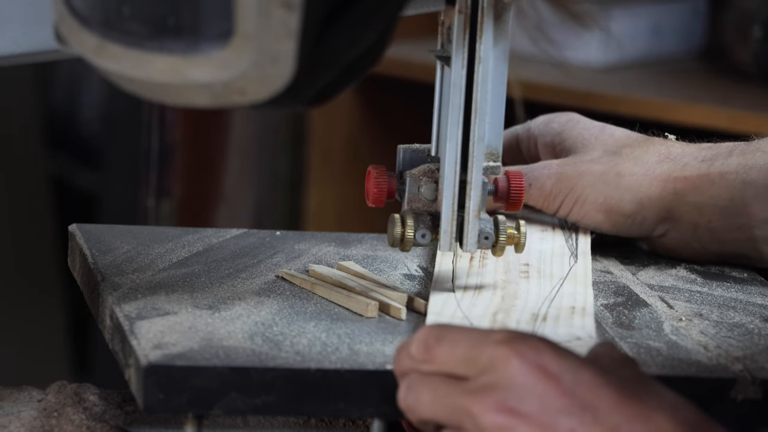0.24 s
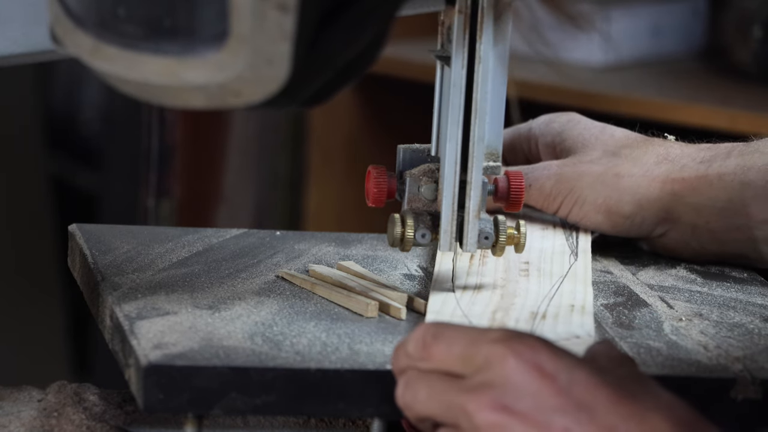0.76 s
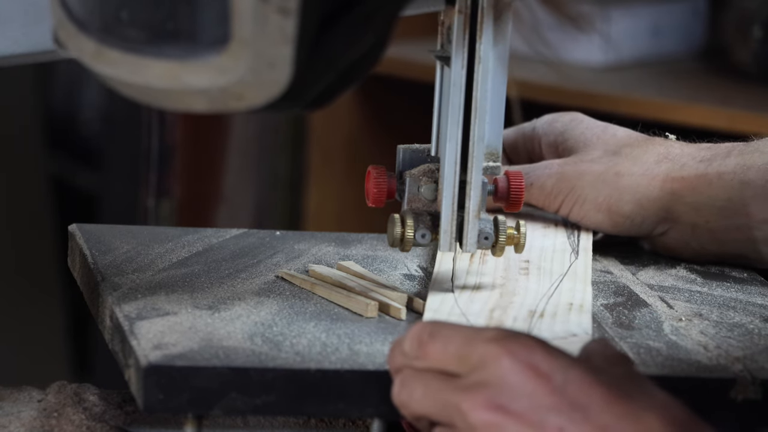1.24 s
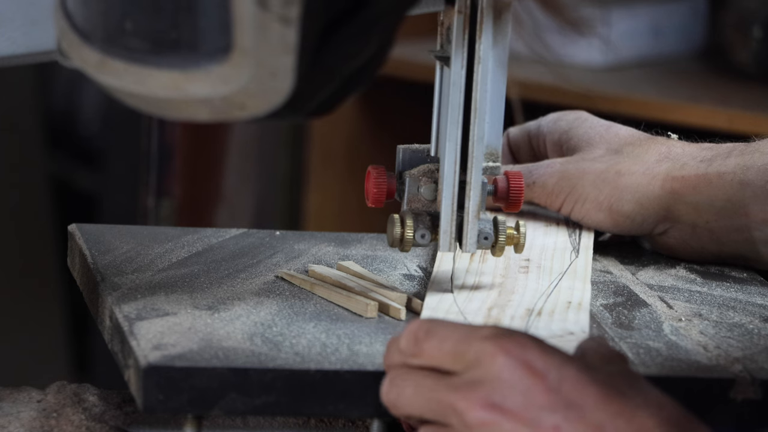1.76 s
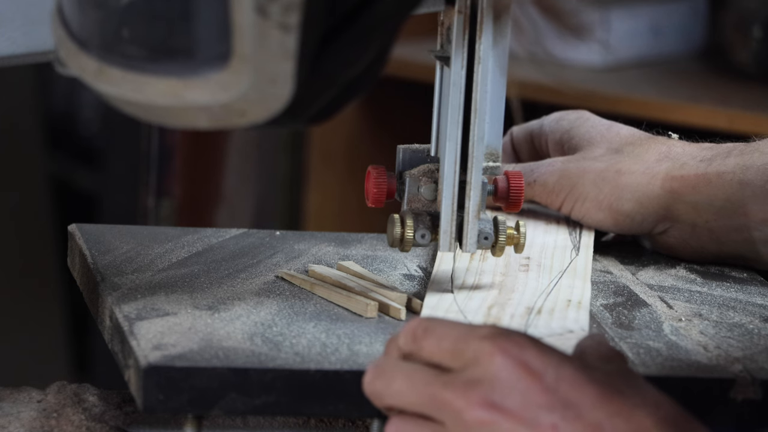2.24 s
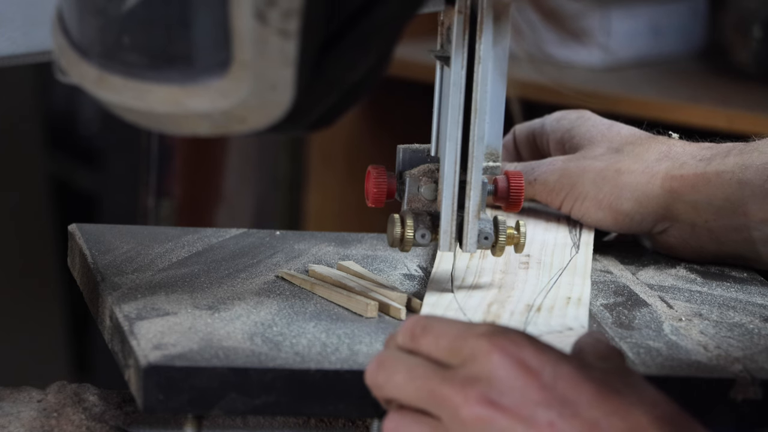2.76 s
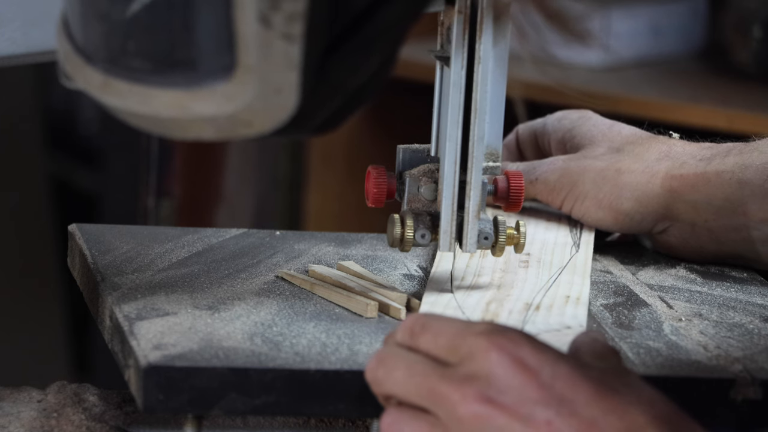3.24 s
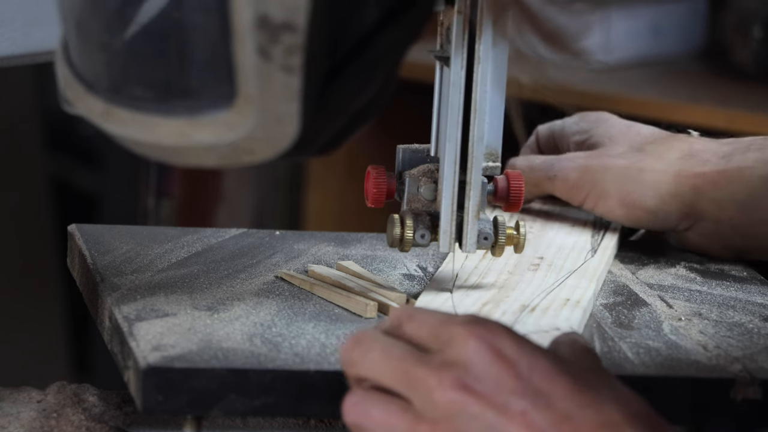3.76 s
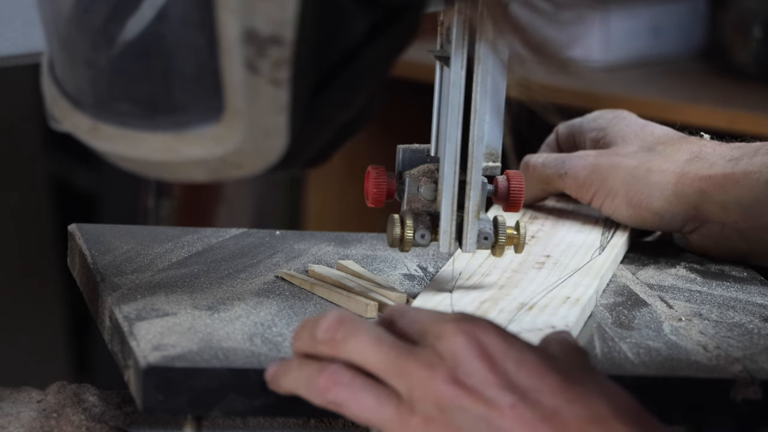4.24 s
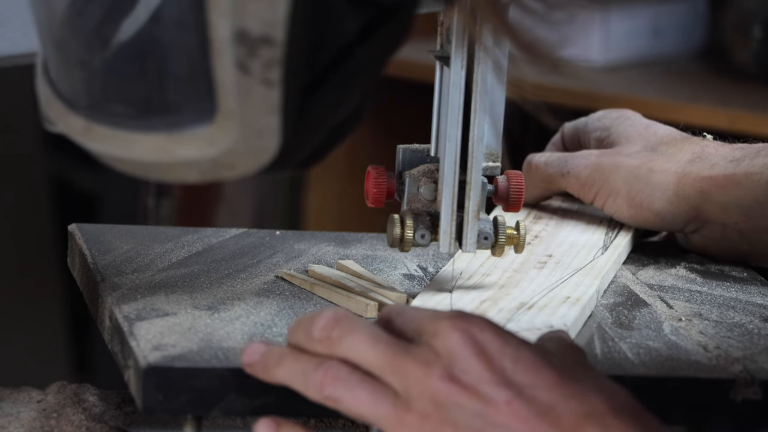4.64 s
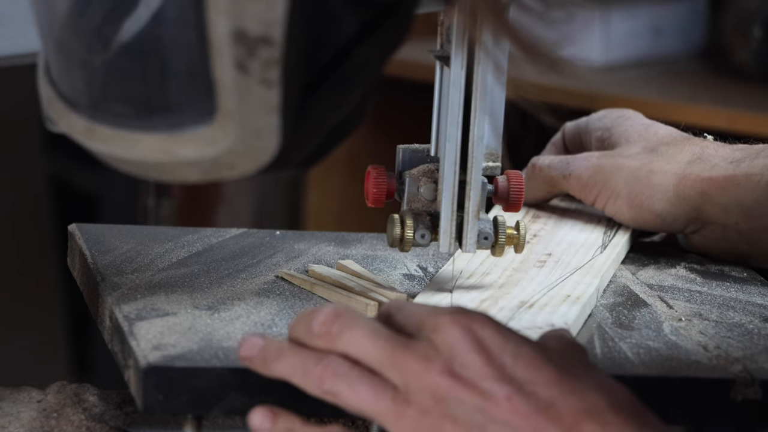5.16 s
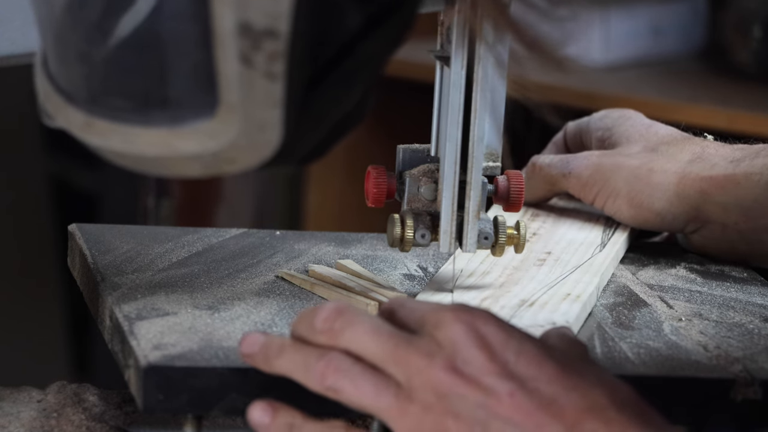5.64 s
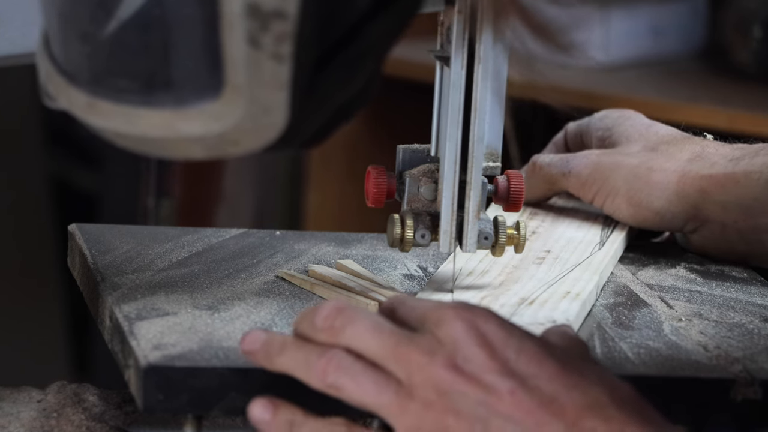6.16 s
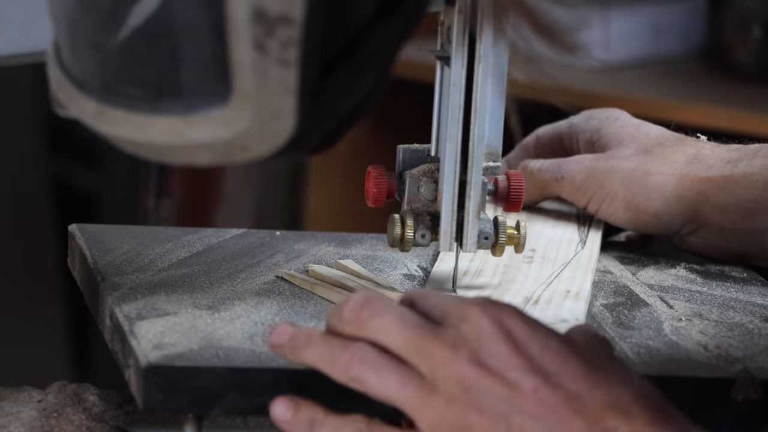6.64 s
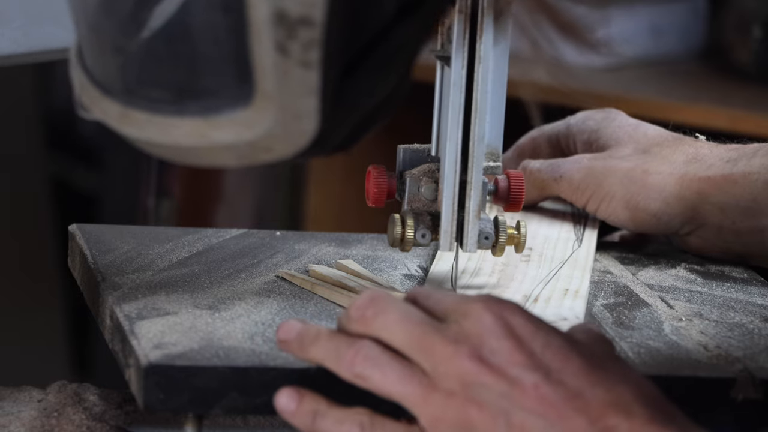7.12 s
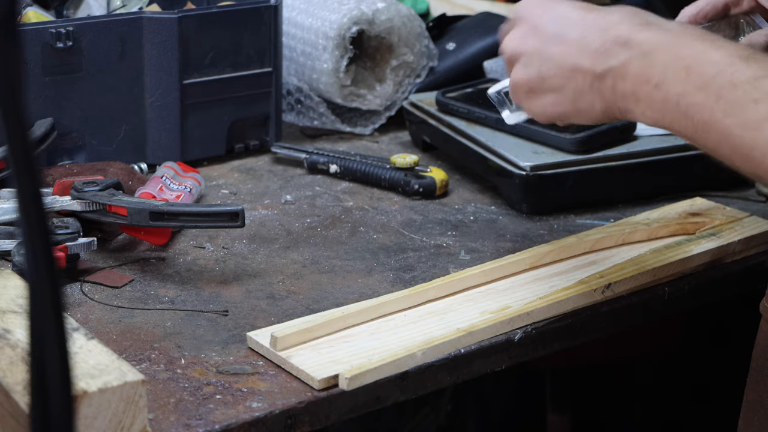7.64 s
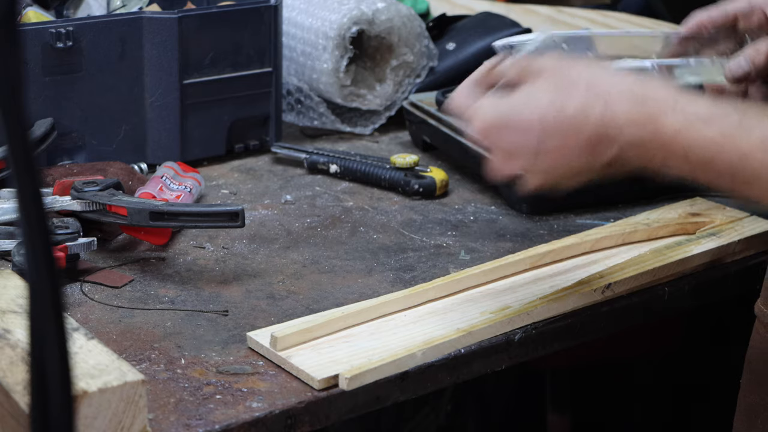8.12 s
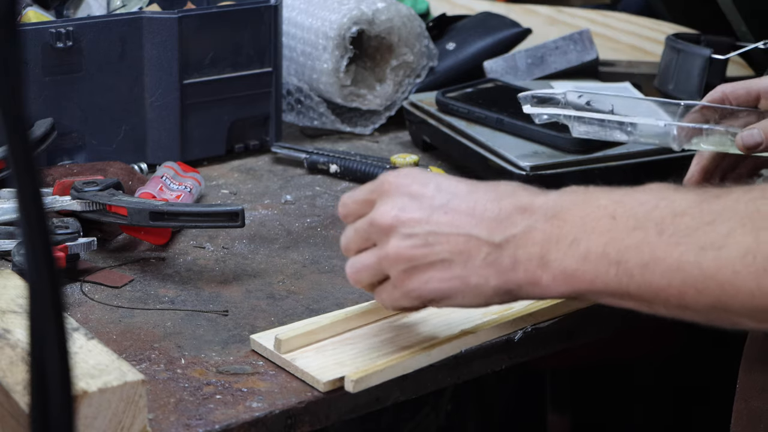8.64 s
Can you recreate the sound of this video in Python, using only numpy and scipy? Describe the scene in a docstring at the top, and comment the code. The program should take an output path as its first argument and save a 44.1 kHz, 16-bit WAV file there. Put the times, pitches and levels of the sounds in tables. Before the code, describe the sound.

In a small workshop a running bandsaw cuts a thin wooden board, heard close and in stereo: piercing metallic whine near one kilohertz and its overtones, dense rasp and bright hiss, with brief easings. After about seven and a half seconds it stops instantly, leaving a quiet bench with low wavering hum, faint room air and a few tiny plastic ticks.

```python
"""From 0 s a bandsaw cuts a thin board in a small workshop: teeth strike about 960 times a second.
Harmonics of the tooth rate make the whine; coloured noise that partly repeats each blade lap makes the cut.
The wheels throb, and narrow noise bands come and go: singing resonances, a low hum and more whine orders.
At 7.58 s the scene changes to a quiet bench: a low sine hum wavers in filtered noise,
with ticks early on made of short decaying noise bursts."""
import sys
import numpy as np
from scipy import signal
from scipy.fft import rfft, irfft, next_fast_len
from scipy.io import wavfile
from scipy.ndimage import uniform_filter1d

SR = 44100
rng = np.random.default_rng(int(sys.argv[2]) if len(sys.argv) > 2 else 0)


def unload_wav(signal):
    """Save mono or channel-first audio to the path in sys.argv[1] as 16-bit WAV at rate SR, clipped to [-1, 1]."""
    wavfile.write(
        sys.argv[1],
        SR,
        np.round(np.clip(np.atleast_2d(signal).T, -1, 1) * 32767).astype(np.int16),
    )


N = 392037


def from_db(db):
    """Decibel law: amplitude gain is ten to the level over twenty."""
    return 10 ** (np.asarray(db) / 20)


def rms_one(x):
    """Energy normalisation: scale a signal to unit root-mean-square."""
    return x / np.sqrt(np.mean(x ** 2) + 1e-20)


def in_time(rows):
    """Linear interpolation: one curve per column, at every sample."""
    times, *columns = np.transpose(rows)
    seconds = np.arange(N) / SR
    return [np.interp(seconds, times, column) for column in columns]


def bins_hz():
    """Fourier analysis: the bin frequencies of a transform that holds the whole scene."""
    return np.maximum(np.fft.rfftfreq(next_fast_len(N), 1 / SR), 1)


def at_bins(points):
    """Logarithmic frequency scale: a (frequency, value) table read at the Fourier bins."""
    hz, value = np.transpose(points)
    return np.interp(np.log(bins_hz()), np.log(hz), value)


def drift(rate_hz, size=N):
    """Low-pass random process: two equal poles leave slow fluctuations of unit rms."""
    step = 40   # the slow process is drawn at every 40th sample
    pole = np.exp(-2 * np.pi * step * rate_hz / SR)
    noise = rng.standard_normal(size // step + 2002)
    slow = signal.lfilter([1], [1, -2 * pole, pole * pole], noise)[2000:]   # drop the settling
    return np.interp(np.arange(size) / step, np.arange(len(slow)), rms_one(slow))


def bump(center_s, length_s):
    """Gaussian envelope: a smooth rise and fall of height 1."""
    return np.exp(-(4 * (np.arange(N) / SR - center_s) / length_s) ** 2 / 2)


def white():
    """White noise: a random spectrum with equal mean power at all frequencies."""
    return rfft(rng.standard_normal(next_fast_len(N)))


def played_bands(mid, side, spectrum, modes, side_db, balance_db, edges_hz, levels_db):
    """Source-filter principle: colour mid and side noise, then play each band at its own level."""
    hz = bins_hz()
    modes_db = sum(db / (1 + (2 * (hz - at) / width) ** 2) for at, width, db in modes)
    colour = from_db(at_bins(spectrum) + modes_db)
    side = side * from_db(side_db)
    left = (mid + side) * from_db(balance_db / 2)
    right = (mid - side) * from_db(-balance_db / 2)
    pair = colour * np.array([left, right])
    below = [0 * hz] + [1 / (1 + (hz / edge) ** 6) for edge in edges_hz] + [0 * hz + 1]
    out = 0
    for low, high, level_db in zip(below, below[1:], levels_db):
        band = irfft(pair * (high - low), next_fast_len(N))[:, :N]
        mid_rms = np.sqrt(np.mean(band.mean(0) ** 2))
        out = out + from_db(level_db) * band / mid_rms
    return out


def thinned(sound, hz, width_hz, share):
    """Band rejection by subtraction: take away a share of one resonant band."""
    band = signal.lfilter(*signal.iirpeak(hz, hz / width_hz, fs=SR), sound)
    return sound - np.clip(share, 0, 1) * band


# Hands brush the tray: (time [s], length [s], swell of the rustle [dB])
TRAY_BRUSHES = [(7.71, 0.056, 3.5), (8.14, .04, 4), (8.703, .1, 2)]
# Bench levels: (time [s], hum level [dB], low drone level [dB], rustle level before brushes [dB])
BENCH_LEVELS = [(7.6, -62, -50.5, -69), (7.88, -53, -50.5, -70), (8.08, -62, -52, -68),
                (8.17, -52, -50, -68.5), (8.3, -49, -51, -66), (8.65, -49.5, -50, -70),
                (8.78, -46, -43.5, -69.5), (8.89, -44, -48, -71)]
# Spectrum of the bench noise before band levels: (frequency [Hz], relative level per Hz [dB])
AIR_SPECTRUM = [(15, -43), (25, -24), (49, -1), (86, -10), (133, -7.5), (152, -14), (183, -15), (227, -15),
                (469, -25), (1240, -28), (13900, -54.5), (15500, -71)]
# Resonances in the bench noise: (frequency [Hz], width [Hz], boost or cut [dB])
AIR_RESONANCES = [(38, 14, -14), (56.4, 14, 6), (136, 27, -0.5), (240, 23, 4.5), (564, 20, 7), (830, 18, 2),
                  (915, 10, 10), (1190, 40, 4), (1370, 30, 5.5), (1600, 180, -1.5), (4600, 270, 3)]
# Stereo width of the bench noise: (frequency [Hz], side minus mid level [dB])
AIR_WIDTH = [(60, -28), (110, -18), (200, -16.5), (380, -9), (700, -5), (1290, 0.5), (2380, 2), (4400, -1),
             (8120, 3), (15000, 1)]
ROOM_AIR_DB = -55   # before it follows the rustle and drifts


def bench_air(hum_db, drone_db, rustle_db):
    """Band-filtered noise: rumble follows the hum, above it lie drone, room air and rustle."""
    rustle_db = rustle_db + sum(db * bump(s, length) for s, length, db in TRAY_BRUSHES)
    room_db = ROOM_AIR_DB + 0.33 * (rustle_db - rustle_db.mean()) + 0.8 * drift(5.3)
    levels_db = [hum_db - 8.0, drone_db, room_db, rustle_db]
    return played_bands(white(), white(), AIR_SPECTRUM, AIR_RESONANCES, at_bins(AIR_WIDTH), 0,
                        [90, 600, 4800], levels_db)


# Pitch of the hum before its random waver: (time [s], frequency [Hz])
HUM_PITCH = [(7.6, 54), (8.15, 58.2), (8.89, 59.8)]


def bench_hum(hum_db):
    """Frequency modulation: the phase of a sine accumulates a randomly wavering frequency."""
    hz = in_time(HUM_PITCH)[0] + 0.92 * drift(2.4)
    return np.sqrt(2) * from_db(hum_db) * np.sin(2 * np.pi * np.cumsum(hz) / SR)


# Plastic tray ticks: (time [s], nominal level before trim, noise and high-pass [dB])
TRAY_TICKS = [(7.6164, -46), (7.6854, -45), (8.1394, -50)]


def tray_ticks():
    """Impulse excitation: each tick is a high-passed noise burst that decays exponentially."""
    clicks = np.zeros(N)
    for time_s, level_db in TRAY_TICKS:
        clicks[round(time_s * SR)] = from_db(level_db - 3.0)
    decay = signal.lfilter([1], [1, -.992], clicks + 1e-18)   # time constant near 3 ms
    bright = signal.butter(2, 4500, "high", fs=SR, output="sos")
    return signal.sosfilt(bright, decay * rng.standard_normal((2, N)))


def bench():
    """Superposition: noise bands, a wavering hum and short bright ticks add linearly."""
    hum_db, drone_db, rustle_db = in_time(BENCH_LEVELS)
    return bench_air(hum_db, drone_db, rustle_db) + bench_hum(hum_db) + tray_ticks()


def echoes(direct):
    """Comb-like interference: a direct path and dying reflections give fine streaks, even overall."""
    t = np.arange(round(.25 * SR)) / SR
    path = rng.standard_normal(len(t)) * np.exp(-t / .022)
    path = path / np.sqrt(np.sum(path ** 2))
    path[0] += direct
    path = rfft(path, next_fast_len(N))
    return path / np.sqrt(uniform_filter1d(abs(path) ** 2, size=2500))


EVEN_BELOW_HZ = 800   # long waves are hardly streaked by reflections


def reflected(sound, direct, count):
    """Changing multipath: reflections crossfade as hands and board move; long waves come straight."""
    place = np.arange(N) / N * (count - 1)
    fades = [np.sqrt(np.clip(1 - abs(place - k), 0, 1)) for k in range(count)]
    streaked = sum(rfft(sound * fade, next_fast_len(N)) * echoes(direct) for fade in fades)
    even = 1 / (1 + (bins_hz() / EVEN_BELOW_HZ) ** 4)
    return np.sqrt(1 - even) * streaked + np.sqrt(even) * rfft(sound, next_fast_len(N))


TEETH_ON_BLADE = 132
LAP_START = 0.98   # radians


def lap_swell(teeth):
    """Periodic modulation: one swing for each lap of the blade, slipping a little in phase."""
    return np.cos(2 * np.pi * teeth / TEETH_ON_BLADE + LAP_START + 1.64 * drift(0.64))


# Levels of the cut before dips and swells:
# (time [s], frame rumble level [dB], board drone level [dB], rasp level [dB], hiss level [dB])
CUT_LEVELS = [(0.0, -45, -33.5, -28.5, -25.5), (0.44, -43.5, -35.5, -28.5, -24),
              (0.97, -46, -39.5, -29.5, -28), (1.33, -42, -38, -27.5, -26),
              (1.45, -44.5, -38.5, -28.5, -30.5), (1.9, -42, -38.5, -26.5, -27),
              (2.9, -42.5, -37.5, -28, -28), (3.27, -46, -37.5, -26.5, -23.5), (3.55, -38, -36.5, -29, -27),
              (4.2, -43.5, -35, -26.5, -26.5), (4.6, -40, -36.5, -28.5, -30.5),
              (5.0, -43, -33.5, -27.5, -27.5), (5.3, -46, -31.5, -26, -29.5), (5.45, -45, -33, -25, -25),
              (6.12, -48.5, -37, -27, -26), (6.5, -40.5, -38.5, -30, -28.5),
              (7.0, -41.5, -36.5, -29, -27.5), (7.4, -39.5, -38, -27, -23), (7.58, -38, -39.5, -31, -28)]
# The cut eases off for a moment: (time [s], length [s], dip of the drone [dB], dip of the hiss [dB])
CUT_EASES = [(1.41, 0.13, 1, 2.5), (1.988, 0.066, -0.5, 4), (2.213, 0.2, -0.5, 5), (2.39, 0.12, 0, 3.5),
             (2.602, 0.12, 1, 6), (3.534, .08, -2, 3.5), (3.743, 0.16, 3.5, 3), (3.934, 0.2, 0, 3.5),
             (5.197, 0.11, 2, 2), (6.616, 0.36, 4.5, 1), (6.9, 0.22, 1, 3), (7.234, 0.1, -0.5, 5)]
LOW_FLOOR_DB = -56.5   # before the shared swell and drift
RASP_SHARE_OF_DIP = 0.69   # of the drone and hiss dips added together


def eased_levels():
    """Amplitude modulation: band levels of the cut change smoothly wherever it eases off."""
    rumble_db, drone_db, rasp_db, hiss_db = in_time(CUT_LEVELS)
    for time_s, length_s, drone_dip_db, hiss_dip_db in CUT_EASES:
        dip = bump(time_s, length_s)
        drone_db = drone_db - drone_dip_db * dip
        hiss_db = hiss_db - hiss_dip_db * dip
        rasp_db = rasp_db - RASP_SHARE_OF_DIP * (drone_dip_db + hiss_dip_db) * dip
    return [LOW_FLOOR_DB, rumble_db + 0.73 * drift(4.5), drone_db, rasp_db, hiss_db]


# Spectrum of the cut before band levels: (frequency [Hz], relative level per Hz [dB])
CUT_SPECTRUM = [(24, -79.5), (40, -40), (70, -28.5), (174, -29.5), (192, -18.5), (247, -15), (797, -24),
                (973, -12), (1190, -18.5), (1960, -4), (2160, -6.5), (2920, -4.5), (4130, -8.5),
                (4800, -3.5), (13200, -2.5), (13900, -7.5), (14600, -5), (15500, -21)]
# Resonances of frame, table, board and room: (frequency [Hz], width [Hz], boost or cut [dB])
BODY_RESONANCES = [(219, 22, 7), (256.2, 11, 15), (324.4, 14, 7), (411.6, 10, 7), (454, 20, 4),
                   (496, 14, -10), (520, 16, 3), (556, 18, 4), (592, 14, -5), (647, 100, 6), (708, 33, 6.5),
                   (790, 10, 7), (858, 12, 6), (890, 23, -4), (1144, 110, -5.5), (1294, 50, 5.5),
                   (1390, 17, 5), (1445, 22, 4), (1670, 55, 2.5), (2012, 28, 8), (2150, 60, -2.5),
                   (2254, 50, 4), (2363, 22, 5), (2444, 70, 4.5), (2600, 50, 3), (2690, 65, -4.5),
                   (2797, 44, 4.5), (2990, 28.4, 6.5), (3090, 80, -3), (3200, 70, 3), (3720, 50, 4.5),
                   (4300, 51, 3.5), (4980, 50, -4), (6080, 43, 5), (7120, 120, 3), (11660, 200, 3),
                   (12000, 120, 2), (12500, 120, 2.5), (13300, 120, 1.5)]
# Stereo width of the cut: (frequency [Hz], side level relative to mid [dB])
CUT_WIDTH = [(60, -35), (110, -37), (200, -27), (380, -11), (700, -9.5), (1290, -7), (2380, -4.5),
             (4400, -2.5), (8120, -0.5), (15000, -3)]
# Stereo balance of the cut: (frequency [Hz], left minus right gain [dB])
CUT_BALANCE = [(60, 0), (110, -1.5), (200, 0), (380, -2.5), (700, -1.5), (1290, -2.5), (2380, -4),
               (4400, 0), (8120, 0), (15000, -4.5)]
# Edges between low floor, rumble, drone, rasp and hiss: (frequency [Hz])
CUT_EDGES_HZ = [172, 320, 1000, 4800]
LAP_SWELL_DB = -0.3   # level swing of the cut once a blade lap
POINTS_PER_TOOTH = 46   # detail of the blade's repeated roughness


def cutting(teeth, turn, repeat_share, bite):
    """Periodic excitation: chips tear off at each tooth; some roughness returns each blade lap."""
    lap = rng.standard_normal(TEETH_ON_BLADE * POINTS_PER_TOOTH)
    blade = rms_one(np.interp(teeth * POINTS_PER_TOOTH % len(lap), np.arange(len(lap)), lap))
    share = np.clip(repeat_share, 0, 1)
    tearing = np.sqrt(share) * blade + np.sqrt(1 - share) * rng.standard_normal(N)
    tearing = tearing * (1 + bite * np.cos(2 * np.pi * teeth))
    mid = reflected(tearing, direct=1.0, count=6)
    # the side signal is partly the same sound by other paths, partly diffuse
    side = reflected(1.05 * tearing + 1.14 * rng.standard_normal(N), direct=0.038, count=3)
    shared_db = 0.09 * np.cos(turn) + 0.5 * drift(15.0) + LAP_SWELL_DB * lap_swell(teeth)
    levels_db = [level_db + shared_db + 1.1 * drift(22) for level_db in eased_levels()]
    return played_bands(mid, side, CUT_SPECTRUM, BODY_RESONANCES, at_bins(CUT_WIDTH),
                        at_bins(CUT_BALANCE), CUT_EDGES_HZ, levels_db)


# Stretches where part of the cutting noise thins out:
# (start [s], end [s], frequency [Hz], width [Hz], greatest share removed [0-1])
CUT_HOLLOWS = [(5.5, 7.9, 4200, 500, .55), (6.2, 7.9, 3550, 250, .3), (6.5, 7.9, 5560, 700, 0.44),
               (6.15, 7.3, 1250, 600, 0.5), (6.45, 6.8, 370, 260, 0.57), (3.5, 4.05, 346, 97, 1),
               (0.8, 3.9, 1600, 370, 0.44), (0, 6, 6260, 440, 0.28), (0, 3.6, 2690, 110, .5),
               (.5, 3, 3080, 120, .4), (4.5, 4.85, 800, 120, 0.3), (2.5, 3.9, 4400, 440, 0.37),
               (0, 1.3, 2660, 500, 0.17), (0.5, 1.5, 2650, 180, 0.2), (6.3, 7.1, 910, 200, 0.3),
               (4, 5.2, 4500, 540, 0.23)]


def hollowed(sound):
    """Time-varying band rejection: each hollow fades in and out over its stretch."""
    out = sound.copy()
    for start, end, hz, width, share in CUT_HOLLOWS:
        part = slice(round(start * SR), round(end * SR))
        fade = signal.windows.tukey(part.stop - part.start, .6)
        out[:, part] = thinned(out[:, part], hz, width, share * fade)
    return out


# Narrow bands that sound for a while: singing resonances, a low hum, whine orders 10 and 13:
# (start [s], end [s], frequency [Hz], width [Hz], relative level [dB])
NARROW_BANDS = [(-1, 1.8, 92.7, 2.5, -68), (6.8, 8.2, 92.7, 2.5, -70), (0, .9, 2005, 30, -32),
                (-.5, 1.5, 8130, 90, -31), (0.097, .8, 10850, 180, -29.5), (-.5, 1.5, 1310, 28, -45),
                (1.2, 1.7, 12550, 90, -36), (6.8, 7.6, 9620, 60, -36), (1.9, 2.8, 410, 10, -45),
                (.8, 1.8, 222, 10, -43), (4.9, 5.2, 320, 10, -44), (5.2, 6.3, 252, 14, -44),
                (5.45, 5.85, 855, 8, -43), (5.9, 6.3, 710, 10, -45), (2.0, 3.2, 7420, 120, -34),
                (.6, 1.9, 7880, 120, -35), (1.301, 3.3, 1292, 24, -43.5), (1.9, 3.5, 2425, 40, -30),
                (2.3, 3.8, 5400, 160, -33), (2.7, 3.8, 7160, 50, -29), (3.11, 3.497, 658, 12, -43),
                (2.4, 3.6, 2350, 25, -38), (2.8, 4.301, 11700, 102.5, -37), (3.9, 4.55, 247, 9, -35),
                (4.05, 4.55, 718, 12, -39), (3.897, 4.6, 2380, 18, -35.5), (4, 5.095, 2470, 28, -32),
                (4.4, 4.92, 555, 10, -41), (4.65, 5.1, 250.2, 7, -34), (4.7, 5.15, 638, 20, -35),
                (4.85, 5.03, 705, 30, -35), (5.05, 5.902, 849, 12, -46), (5.103, 6, 2960, 28, -34.5),
                (5.203, 6.297, 2435, 33, -32), (5.407, 6, 1990, 25, -34), (5.3, 6.5, 6900, 98, -32.5),
                (6.399, 7.1, 256.1, 12, -40), (1.297, 2.8, 7600, 109, -34.5),
                (3.898, 5.4, 5370, 120, -34.5), (2.801, 3.6, 9050, 150, -35.5), (7.199, 7.6, 8200, 80, -31)]
# The orders lean as hands and board move:
# (time [s], then left minus right level of orders 1, 2, 3, 4, 5, 6, 7, 8, 9, 11 [dB])
ORDER_LEAN = [(0.0, 2, 0.5, -4, -3.5, -4.0, 3.0, -3.0, -0.5, -1.0, 1.5),
              (0.98, 2.0, -2, -6, -5.5, -4.0, -2.5, 2.0, 0, -6, 8),
              (2.1, -3.5, -10, 1, -5.5, -3.0, -3.5, -3.0, -3.0, -4, 3.5),
              (3.25, -2.5, -11.5, -4.5, -5.5, 3.5, -2.0, -4.5, 1, -1, 1.5),
              (3.96, -1.0, -8.0, -3.5, 0.0, 6.0, -5, -1.0, -3.5, -5, -2.5),
              (4.59, -2.0, -7, -8, 0.0, 5, 2, 0, -2.5, 2.0, 1.0),
              (5.72, 2.0, -3.5, 1.5, -1, 5.0, 7.0, 1, -1.0, -1, 1.5),
              (6.56, -0.5, -2.5, -2.5, -0.5, 4.5, -1, -3, 1.5, -7, 1.0),
              (7.57, -1, -3.5, 2.0, 0.5, 1.5, -0.5, 0, -2.0, -7.5, 9)]
# Harmonics of the tooth rate in the whine tables: (order [multiple of the tooth rate])
ORDERS = [1, 2, 3, 4, 5, 6, 7, 8, 9, 11]
SAG_HZ_PER_S, SAG_AT_HZ = 90, 7630   # each band sinks in pitch, as the square of its frequency


def narrow_bands():
    """Narrow-band noise: each band swells in and out, leaning like the whine near its pitch."""
    out = np.zeros((2, N))
    lean = np.array(ORDER_LEAN)
    for start, end, hz, width, level_db in NARROW_BANDS:
        first = max(round(start * SR), 0)
        size = min(round(end * SR), N) - first
        t = np.arange(size) / SR
        full_size = size + first - round(start * SR)   # a swell may begin before 0 s
        swell = from_db(level_db) * signal.windows.tukey(full_size, .8)[-size:]
        flutter = 9.0 / width + drift(width / 2, size) + 1j * drift(width / 2, size)
        flutter = flutter / (abs(flutter) + 0.083) ** .15   # its swings are evened a little
        sag_hz_per_s = SAG_HZ_PER_S * (hz / SAG_AT_HZ) ** 2
        cycles = hz * t - sag_hz_per_s * (t - t[-1] / 2) ** 2 / 2
        carrier = flutter * np.exp(2j * np.pi * cycles)
        nearest_row = lean[abs(lean[:, 0] - (start + end) / 2).argmin(), 1:]
        lean_db = 0.67 * np.interp(hz / TOOTH_RATE[0][1], [0] + ORDERS, [0, *nearest_row])
        lead = 2 * min(hz / 3000, 1.5) * drift(3.0, size)   # the ears agree less at high pitch
        gap = from_db(lean_db / 2) * np.exp(1j * lead / 2)
        out[:, first:first + size] += swell * np.real([carrier * gap, carrier / gap])
    return out


# Whine of the teeth before drift: (time [s], then level of orders 1, 2, 3, 4 [dB])
LOW_WHINE = [(0.0, -31, -31, -32, -27), (0.05, -28, -28.5, -27, -25.5), (0.11, -36, -34.0, -39.0, -30),
             (0.21, -39, -36.0, -37, -27.5), (0.29, -45, -28, -39, -29), (0.42, -45, -24.5, -38, -24.5),
             (0.69, -41.5, -25.5, -32.0, -26), (0.89, -39.5, -31, -31.5, -26),
             (0.99, -37.0, -31, -31.0, -23.5), (1.1, -38, -28.5, -38, -32), (1.23, -39.5, -25, -34, -25.5),
             (1.34, -44, -29, -31.5, -21.5), (1.43, -41.5, -32, -39, -30.0),
             (1.58, -43.0, -32.5, -43, -30.5), (1.82, -38.5, -29.5, -36.0, -25),
             (1.93, -47, -35.5, -40, -28), (2.06, -40.5, -30.5, -36, -27), (2.19, -46, -32.5, -42.0, -30.5),
             (2.28, -38, -25, -42.5, -27.5), (2.38, -45, -31.5, -38.5, -33),
             (2.5, -39.5, -27.5, -37.5, -24), (2.59, -43.0, -33.5, -40, -33.5),
             (2.69, -41.5, -27.5, -37.0, -27.5), (2.81, -43, -32, -33.5, -33),
             (3.01, -39.5, -32, -36, -38.0), (3.14, -47, -33.5, -32, -35), (3.45, -40.0, -24.5, -35, -44.5),
             (3.61, -40.0, -25, -39.0, -46.0), (3.73, -42, -28.0, -41, -44.5),
             (3.83, -32.5, -30.5, -31.5, -38.0), (3.91, -36, -28.5, -39, -39.5),
             (4.01, -32, -26.5, -30, -46.5), (4.14, -29.0, -31.5, -29.0, -45.5),
             (4.27, -29.0, -35, -36, -45.0), (4.38, -31, -39, -40, -45.5),
             (4.6, -33.0, -32.0, -29.5, -48.5), (4.8, -41.5, -26, -29, -34), (5.07, -41, -26, -26, -46.5),
             (5.19, -40.5, -33.0, -33, -46.0), (5.39, -42, -28.5, -25.5, -41.5),
             (5.45, -40, -23.5, -25, -40.0), (5.57, -40, -29.0, -33, -39), (5.67, -38.0, -23.0, -29.5, -35),
             (5.82, -34.5, -20.5, -34, -35), (5.9, -35, -23, -27.5, -34.0), (5.98, -39.0, -29, -27.5, -42),
             (6.23, -42.5, -26.0, -27, -31.5), (6.43, -44, -30.5, -29, -35.0), (6.52, -42, -26, -30, -46),
             (6.66, -45.0, -24, -29, -42), (6.74, -44.0, -22.5, -28, -33.5), (6.86, -43.0, -38, -35, -37.0),
             (6.94, -37.5, -41, -32, -42.5), (7.13, -42.5, -33.0, -28, -28.5),
             (7.23, -38.0, -34.5, -32, -38), (7.3, -38.0, -35, -25.5, -33.5), (7.45, -40, -32, -31, -28),
             (7.57, -46, -41, -26, -33)]
# Upper whine before drift: (time [s], then level of orders 5, 6, 7, 8, 9, 11 [dB])
HIGH_WHINE = [(0.0, -34, -38, -42, -44, -32, -35), (0.22, -42.0, -42.5, -44.0, -44.0, -38.5, -38.0),
              (0.4, -36.5, -40.5, -38.0, -43, -31, -33), (0.98, -35, -34, -43, -42, -35.5, -30.5),
              (1.29, -38.5, -29, -37.5, -36.0, -31, -33), (1.53, -43.5, -31, -43, -36.5, -40, -38),
              (1.95, -39, -28, -43.5, -35.5, -36.0, -38.0), (2.84, -39.5, -35.0, -47, -48, -44, -44.0),
              (3.3, -34, -33.0, -43.0, -47.5, -34, -36), (3.68, -39, -43.5, -45.5, -46, -42.5, -46),
              (4.09, -34, -35, -40, -48.5, -37.0, -39.5), (4.5, -38, -41, -42.5, -46, -40, -46.0),
              (4.8, -33, -39.0, -43, -54, -38, -41.5), (5.03, -33, -43.0, -39.0, -39.5, -32, -42.5),
              (5.26, -33.5, -39, -36, -48.0, -33, -44.0), (5.92, -29, -37.5, -32, -38.5, -32, -30),
              (6.37, -31.5, -36.5, -27, -40.5, -34.5, -37), (6.59, -36.0, -37.0, -32, -33, -36, -42.5),
              (6.85, -37, -45, -32, -38, -38, -40.5), (7.12, -27, -38, -31, -46.5, -37.5, -38.0),
              (7.38, -32, -36, -32.5, -35, -36.5, -29), (7.57, -38, -39, -30.0, -34, -37.0, -37.0)]
# Phase by which the left ear leads, one entry per order in ORDERS, before wander: (lead [rad])
EAR_LEAD = [0, 0, .35, -0.25, -1.6, -1.6, -1.4, -.1, .9, 1.9]
# The second order turns between the ears: (time [s], added lead [rad])
SECOND_ORDER_LEAD = [(0, 1.5), (.9, 1.2), (1.3, 0), (3.5, -.4), (4.8, -.3), (5.4, 1.1), (6, 1), (6.5, .3),
                     (7.5, -.5)]
LAP_SWELL = 0.23   # share of the steady whine that swells once a blade lap


def whine(teeth, turn, throb, rough, rough_hz):
    """Harmonic series: tooth-rate orders swell with wheel and blade; uneven teeth roughen them."""
    out = np.zeros((2, N))
    levels_db = in_time(LOW_WHINE) + in_time(HIGH_WHINE)
    for order, level_db, lean_db, lead in zip(ORDERS, levels_db, in_time(ORDER_LEAN), EAR_LEAD):
        wheel_swell = 1 + throb / order ** 0.12 * np.cos(turn + 0.246 * drift(0.81))
        steady = wheel_swell * (1 + LAP_SWELL * lap_swell(teeth))
        # the rough part is wider at high orders
        uneven = rough * order ** 0.36 * (drift(rough_hz * order) + 1j * drift(rough_hz * order))
        envelope = steady + uneven
        envelope = envelope / np.sqrt(np.mean(abs(envelope) ** 2))
        tone = envelope * np.exp(2j * np.pi * order * teeth)
        tone = np.sqrt(2) * from_db(level_db + 1.1 * drift(9.0)) * tone
        lead = lead + (order == 2) * in_time(SECOND_ORDER_LEAD)[0]
        wander = 0.14 * order ** .2 * drift(2.34)   # the lead wanders a little
        gap = from_db(lean_db / 2) * np.exp(1j * (lead / 2 + wander))
        out += np.real([tone * gap, tone / gap])
    return out


# Blade speed before wander and wobble: (time [s], tooth rate [teeth per s])
TOOTH_RATE = [(0.0, 957.0), (0.77, 958.5), (0.94, 961.0), (1.16, 960.0), (1.5, 966.0), (1.68, 964.5),
              (1.76, 966.5), (1.84, 962.5), (2.01, 968.0), (2.1, 966.5), (2.27, 971.0), (2.41, 970.0),
              (2.49, 965.5), (2.58, 970.0), (3.02, 965.0), (3.41, 969.5), (3.6, 976.5), (3.67, 972.0),
              (3.74, 974.5), (3.82, 970.0), (4.0, 972.5), (4.09, 962.5), (4.46, 963.5), (4.54, 964.0),
              (4.99, 957.0), (5.32, 963.5), (5.53, 957.5), (5.82, 955.5), (6.14, 959.0), (6.34, 958.5),
              (6.52, 977.0), (6.59, 975.0), (7.12, 961.0), (7.57, 963.0)]
# Swell of the whine once a wheel turn, shallower at high orders: (time [s], depth [0-1])
WHEEL_THROB = [(0, .1), (.5, .9), (1.2, 0.4), (3, .05), (5.2, 0.1), (5.9, 0.55), (6.5, 0.15), (7.1, .4),
               (7.58, 0.35)]
TEETH_PER_WHEEL_TURN = 62.4
SPEED_WANDER, TOOTH_JITTER = 1.0, 0.009   # rms: teeth per s, share of a tooth spacing


def bandsaw():
    """Kinematic coupling: blade travel drives whine and cut; the eccentric wheel wobbles its speed."""
    travel = np.cumsum(in_time(TOOTH_RATE)[0] + SPEED_WANDER * drift(4.053)) / SR   # in teeth
    turn = 2 * np.pi * travel / TEETH_PER_WHEEL_TURN + 2.52
    teeth = travel + 0.025 * np.sin(turn) + TOOTH_JITTER * drift(40.0)
    blade = whine(teeth, turn, throb=in_time(WHEEL_THROB)[0], rough=0.24, rough_hz=13.8)
    cut = hollowed(cutting(teeth, turn, repeat_share=0.45, bite=0.18))
    return blade + narrow_bands() + cut


SCENE_CHANGE_S = 7.5805


def scene():
    """Complementary gating: the saw gives way to the bench in less than a millisecond."""
    sawing = np.clip((SCENE_CHANGE_S - np.arange(N) / SR) * 1500, 0, 1)
    return sawing * bandsaw() + (1 - sawing) * bench()


CUTOFF_HZ = 15700   # start of the low-pass stopband, 70 dB down


def record(dry):
    """Linear filtering: one narrow band near 9.9 kHz is thinned and a low-pass cuts the top."""
    heard = thinned(dry, hz=9920, width_hz=140, share=0.8)
    return signal.sosfilt(signal.cheby2(12, 70, CUTOFF_HZ, fs=SR, output="sos"), heard)


dry = scene()
out = record(dry)
unload_wav(out)
```